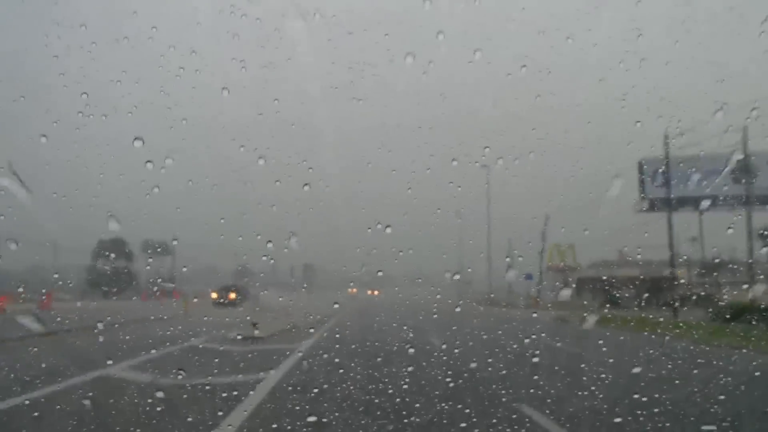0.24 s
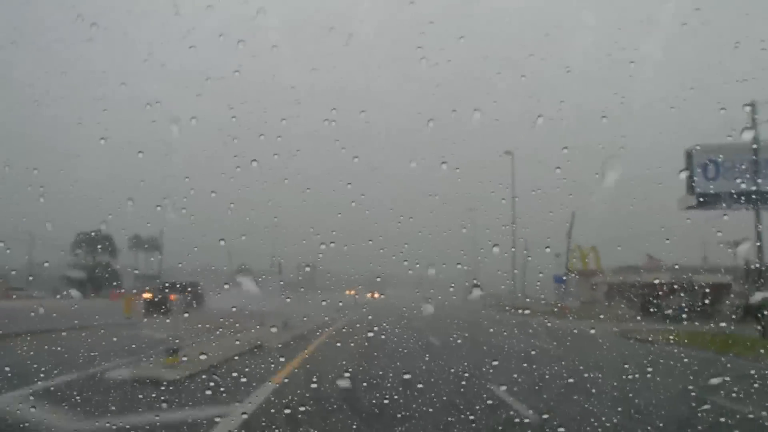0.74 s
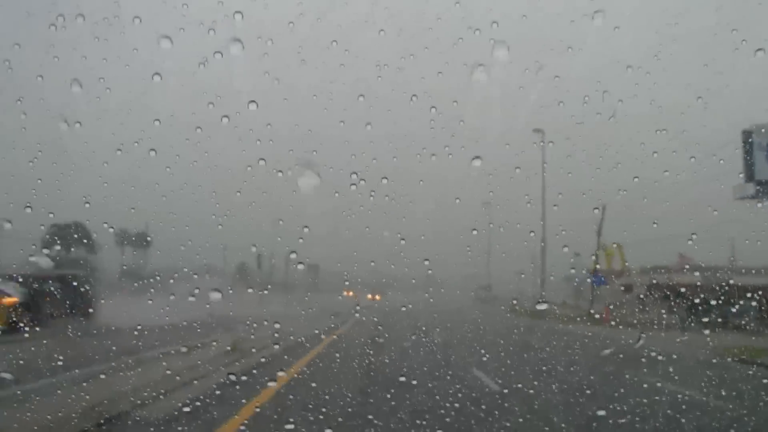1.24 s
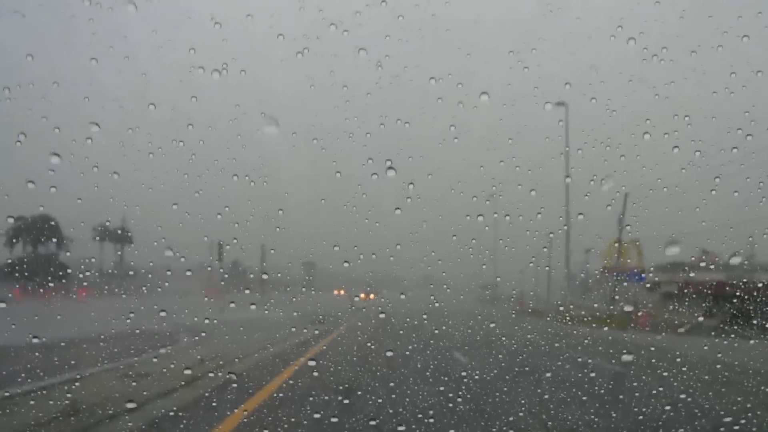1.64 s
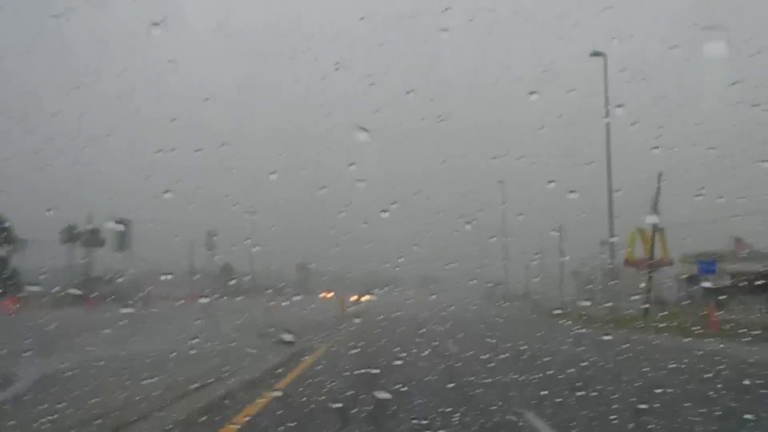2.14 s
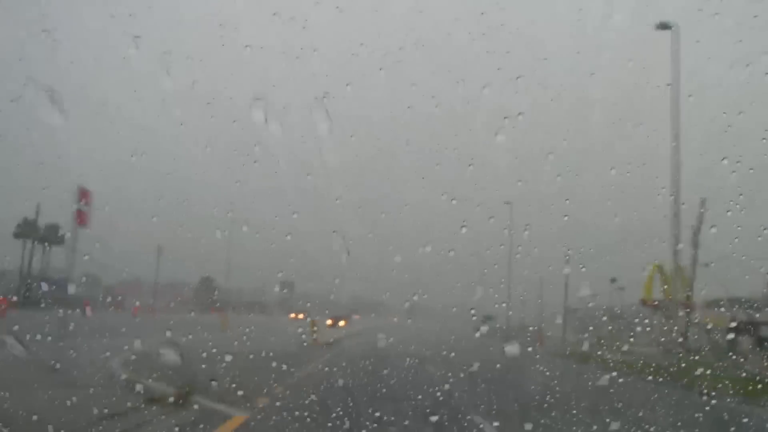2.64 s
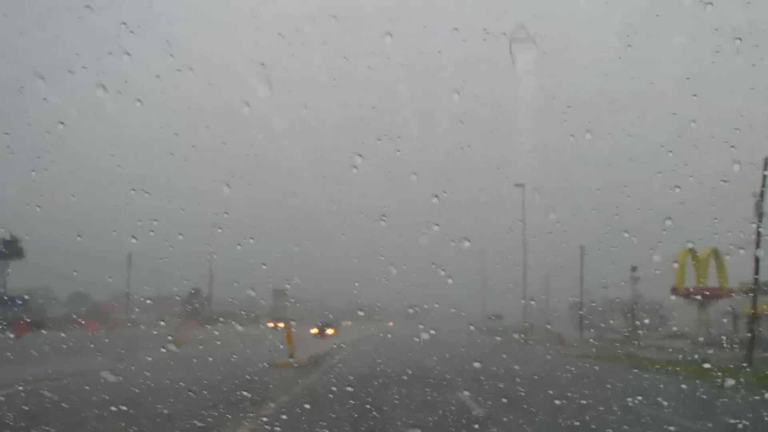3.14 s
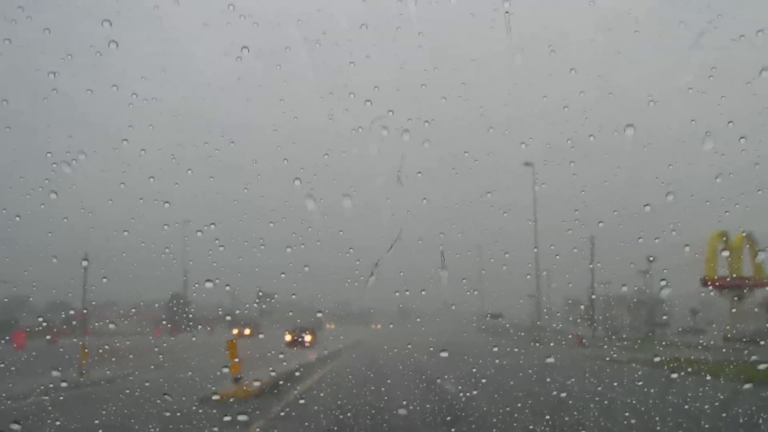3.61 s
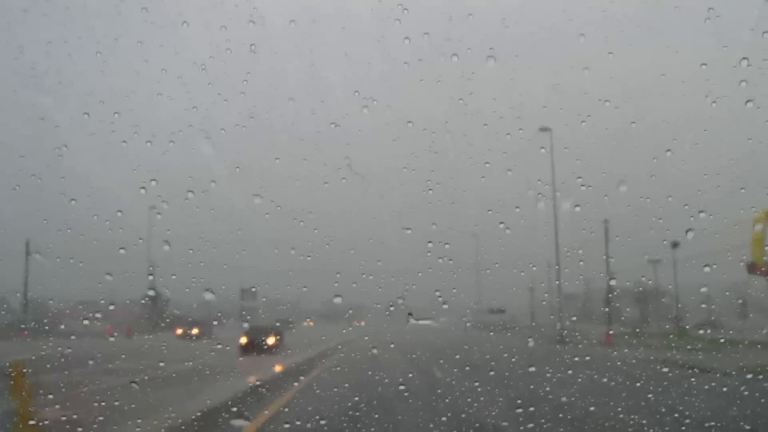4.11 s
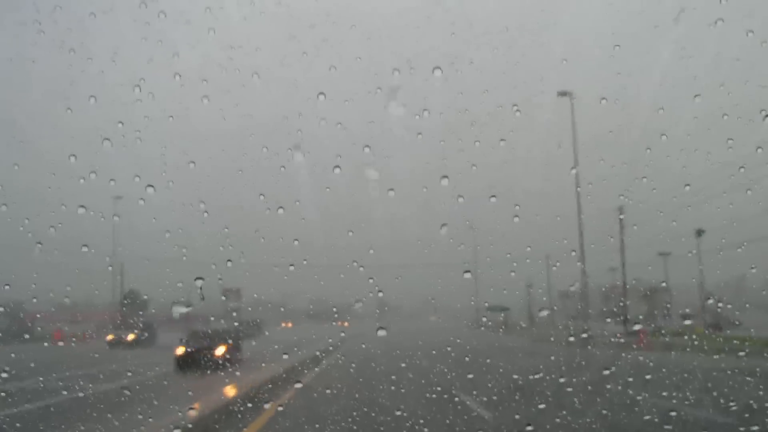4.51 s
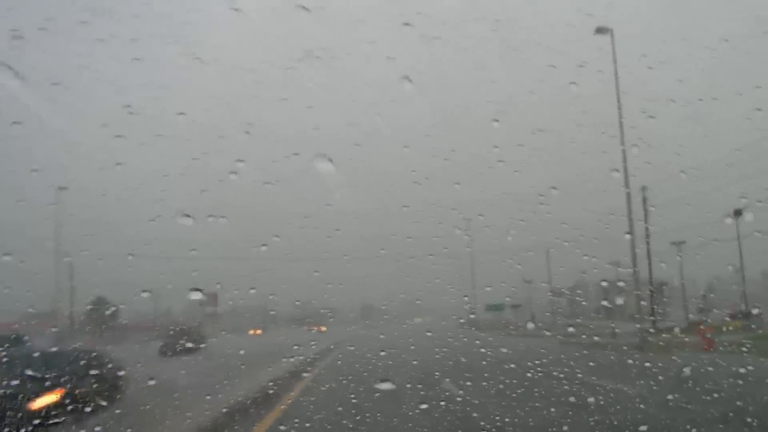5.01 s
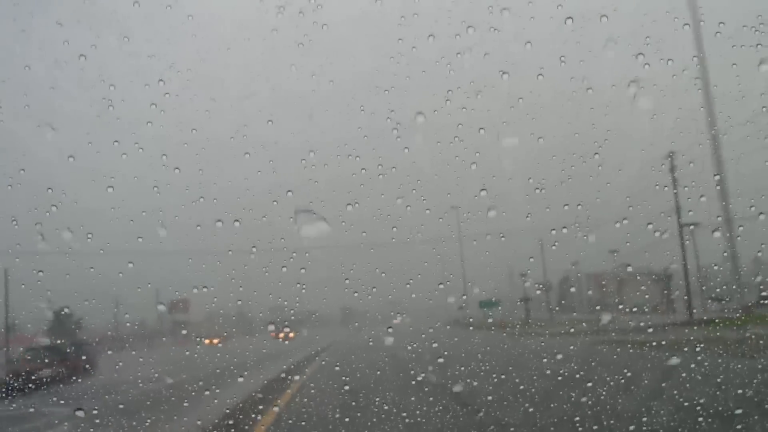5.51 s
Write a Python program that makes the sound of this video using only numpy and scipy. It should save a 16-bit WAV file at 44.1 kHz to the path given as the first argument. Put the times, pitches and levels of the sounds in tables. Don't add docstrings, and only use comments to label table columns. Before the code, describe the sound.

Inside a car driving through a heavy downpour, loud rain on windshield and roof fills the whole stretch of just under six seconds. It is a dense, rough hiss made of thousands of tiny impacts, strongest in the upper midrange, with a quieter fizz of spray on top. Single large drops snap out irregularly, a few per second, as hard, dry taps; prominent ones come near 0.3, 1.4, 2.4 and 3.7 s. Gusts lift the rain slightly around 1.3 and 3 s, and it slackens a little towards the end. After hard hits the level ducks for a moment, notably near 0.5, 2.4, 3.05 and 5.4 s. Far below are faint tyre roar and floor rumble, a bit rougher around 3.6 to 4.1 s, and a low engine hum that drops out after 2 s and returns by 3.3 s. Close, mono, slightly overloaded small microphone; little echo.

```python
import sys
import numpy as np
from scipy import signal
from scipy.fft import rfft, irfft
from scipy.io import wavfile
from scipy.ndimage import uniform_filter1d

SR = 44100
rng = np.random.default_rng(int(sys.argv[2]) if len(sys.argv) > 2 else 0)


def nominal_scale(level):
    x = np.asarray(level, float) / 20
    return 10 ** x


def output_pcm(signal):
    pcm = np.clip(np.atleast_2d(signal).T, -1, 1) * 32767
    wavfile.write(sys.argv[1], SR, np.round(pcm).astype(np.int16))


N = 254016

# (time [s], rain level [dB])
STORM = [(0, -15.5), (.3, -15), (.6, -16.5), (1.0, -16.3), (1.3, -14.5), (1.5, -17), (1.9, -17),
         (2.15, -17), (2.35, -15.5), (2.7, -16.5), (2.95, -14), (3.3, -15), (3.6, -15), (4.0, -16),
         (4.45, -16), (4.9, -16), (5.2, -16.5), (5.76, -17)]
# (frequency [Hz], gain [dB per Hz])
PANEL_RESPONSE = [(120, -47), (200, -18.5), (403, -21), (465, -23), (530, -12.5), (600, -12.5), (800, -9.5),
                  (1330, -9), (1950, -9.5), (2520, -3.5), (3460, -0.62), (4190, -10), (9000, -22),
                  (12000, -49)]
# (frequency [Hz], gain [dB per Hz])
SPRAY_RESPONSE = [(4120, -40), (7000, -8), (9390, -3.5), (12400, -5.5), (14600, -2), (15100, -3.5),
                  (15700, -10)]


def rain():
    rain_db = np.interp(np.arange(N) / SR, *np.transpose(STORM))
    spray_db = -18 + 0.09 * (rain_db + 20) + 0.4 * walk(4.4)
    gust = nominal_scale(0.52 * walk(30) + 0.7 * walk(90))
    roof = drops(4000, spread_db=3.6, most_db=7.7, splash_ms=0.6, tail_ms=3.6, tail_db=-6)
    glass = drops(1500, spread_db=7.0, most_db=13.0, splash_ms=0.38, tail_ms=1.5, tail_db=-10.5)
    dull, bright = split(glass, 1420)
    stiff_glass = bright + nominal_scale(-11.5) * dull
    patter = gust * (level(roof, -2.7) + nominal_scale(-4.0) * stiff_glass)
    body, _ = split(colour(patter, PANEL_RESPONSE), 7980)

    spray = drops(600, spread_db=4.7, most_db=20.5, splash_ms=0.3, tail_ms=3, tail_db=-24)
    _, fizz = split(spray, 9200)
    mist = level(patter, 0) + gust * nominal_scale(-3.5) * fizz
    _, treble = split(colour(mist, SPRAY_RESPONSE), 7900)
    return nominal_scale(rain_db) * (level(body, 0) + nominal_scale(spray_db) * level(treble, 0))


def drops(rate, spread_db, most_db, splash_ms, tail_ms, tail_db):
    chance = rng.random((2, N))
    size_db = -spread_db * np.log(chance[1] + 1e-9)
    size = nominal_scale(np.minimum(size_db, most_db))
    hits = (chance[0] < rate / SR) * size ** 2
    splash = fade(hits, splash_ms / 1000)
    tail = nominal_scale(tail_db) ** 2 * fade(hits, tail_ms / 1000)
    return level(np.sqrt(splash + tail) * rng.standard_normal(N), 0)


# (time of peak [s], peak level [dB], splash length [ms])
BIG_DROPS = [(0.0896, -7, 0.81), (0.2585, 1, 1.2), (0.5178, -6, 0.75), (0.7258, -0.5, 1.3),
             (0.9051, -0.5, 1.2), (1.0001, -3, 1.3), (1.3987, 1, 1.3), (1.4857, 2, .9), (1.6748, -4, 1.1),
             (1.7444, -2, 0.86), (1.8398, 0, 0.6), (2.0733, -2, 0.69), (2.4081, 1, 0.87),
             (2.6333, -3, 0.77), (2.6585, -3, .8), (2.7954, -8, .7), (2.8712, -12, 0.85),
             (3.0473, -6, 0.68), (3.3282, -3, 0.54), (3.4017, -9, .9), (3.6708, 1, 1.1), (3.9524, -1, 0.99),
             (4.242, -4, 1.1), (4.6803, -6, .6), (4.7105, -1, 0.66), (4.968, -2, 0.75), (5.085, -2, .63),
             (5.4096, -3, 1), (5.6101, -1, 0.82), (5.6781, -3, .95)]
# (time of peak [s], peak level [dB])
SPRAY_TICKS = [(0.0368, -16), (0.2034, -20), (0.4437, -15), (0.6782, -21), (0.726, -17), (0.8488, -16),
               (1.2288, -14), (1.2841, -17), (1.3034, -16), (1.3402, -16), (1.3829, -18), (1.6936, -16),
               (2.0492, -14), (2.2595, -17), (2.3344, -16), (2.4041, -18), (2.7053, -18), (2.949, -20),
               (2.971, -17), (3.3349, -18), (3.3867, -18), (3.6041, -16), (3.7263, -25), (3.8053, -25),
               (4.0655, -18), (4.3611, -17), (4.4933, -19), (4.8453, -36), (4.9579, -12), (5.084, -17)]


def big_drops():
    click = np.zeros(400)
    click[40] = 1
    dull, bright = split(colour(click, PANEL_RESPONSE)[:400], 1800)
    _, fizz = split(colour(click, SPRAY_RESPONSE)[:400], 9200)
    thud, edge = split(bright + nominal_scale(-8.0) * dull, 4600)
    tap_ring = thud + nominal_scale(-4.5) * edge + nominal_scale(-29.5) * fizz

    ordinary_taps = scattered(count=160, db=-5.5, scatter_db=1.5, ms=0.8, scatter_ms=0.3)
    ordinary_ticks = scattered(count=80, db=-20.5, scatter_db=1, ms=0.7, scatter_ms=0.093)
    strong_ticks = [(s, db, 0.55) for s, db in SPRAY_TICKS]
    taps = splashes([*BIG_DROPS, *ordinary_taps], tap_ring)
    ticks = splashes([*strong_ticks, *ordinary_ticks], fizz)
    return nominal_scale(1.0) * taps + nominal_scale(3.0) * ticks


def scattered(count, db, scatter_db, ms, scatter_ms):
    when = rng.uniform(0.02, N / SR - 0.02, count)
    size = rng.standard_normal((count, 2))
    return np.column_stack([when, db + scatter_db * size[:, 0], ms + scatter_ms * size[:, 1]])


def splashes(rows, ring):
    out = np.zeros(N + 400)
    t_ms = (np.arange(400) - 120) / SR * 1000
    for (s, db, ms), noise in zip(rows, rng.standard_normal((len(rows), 400))):
        width_ms = max(ms, 0.3) * np.where(t_ms < 0, 0.45, 0.6)
        burst = np.convolve(noise * np.exp(-(t_ms / width_ms) ** 2), ring)[:400]
        size = np.abs(burst)
        start = int(s * SR) - np.argmax(size)
        out[start:start + 400] += nominal_scale(db) * burst / size.max()
    return out[:N]


# (frequency [Hz], level [dB per Hz])
ROAD_SPECTRUM = [(12, -50), (23, -21), (31, -3), (58, -3), (72, -9), (105, -6), (135, -1.5), (170, 1.5),
                 (240, -3.5), (400, -3.5), (450, -6), (580, -37), (990, -120)]
# (time [s], level [dB])
ROUGHNESS = [(0, 2), (.5, -2), (.75, 2), (1.2, 1), (1.5, -7), (1.65, 0), (1.95, -2), (2.25, 1), (2.45, 1),
             (2.62, 4), (3.05, 0), (3.6, 7), (3.85, 4), (4.08, 8), (4.5, -8), (4.7, 0), (5.3, -1.5),
             (5.76, -4)]


def road():
    rough_db = np.interp(np.arange(N) / SR, *np.transpose(ROUGHNESS))
    shake, roar = split(colour(rng.standard_normal(N), ROAD_SPECTRUM), 114)
    return nominal_scale(rough_db) * level(shake, -50) + nominal_scale(0.36 * rough_db) * level(roar, -41.5)


# (time [s], base frequency [Hz], engine level [dB], gear whine level [dB])
ENGINE_RUN = [
    (0, 30, 0.5, -47),
    (.6, 29.88, 2.5, -47),
    (1.7, 29.6, 1, -50),
    (2.1, 29.6, -24, -53),
    (3.3, 29.28, 3.5, -58),
    (4.2, 29.15, 1, -52),
    (4.9, 29.27, -3, -50),
    (5.76, 29.43, -2.5, -50),
]
# (multiple of base frequency [1], level [dB])
ENGINE_ORDERS = [
    (4, -48.5),
    (5, -51),
    (6, -58),
    (8, -52.5),
]


def engine():
    t = np.arange(N) / SR
    s, hz, engine_db, whine_db = np.transpose(ENGINE_RUN)
    shaft_hz = np.interp(t, s, hz) * (1 + 0.0026 * walk(6.3))
    turn = 2 * np.pi * np.cumsum(shaft_hz) / SR
    hum = np.zeros(N)
    for multiple, db in ENGINE_ORDERS:
        hum += nominal_scale(db + 0.8 * walk(5.65)) * np.sqrt(2) * np.sin(multiple * turn)
    whine_hz = 548 * (1 + 0.00291 * walk(9.8))
    whine = np.sin(2 * np.pi * np.cumsum(whine_hz) / SR)
    return nominal_scale(np.interp(t, s, whine_db) + 3.5) * whine + nominal_scale(np.interp(t, s, engine_db)) * hum


def colour(x, points):
    hz, db = np.transpose(points)
    f = np.linspace(1, SR / 2, 4097)
    cepstrum = irfft(np.interp(np.log(f), np.log(hz), db) * np.log(10) / 20)
    cepstrum[1:4096] *= 2
    cepstrum[4097:] = 0
    return signal.fftconvolve(x, irfft(np.exp(rfft(cepstrum))))[:N]


def split(x, hz):
    low = signal.sosfiltfilt(signal.butter(3, hz, fs=SR, output="sos"), x)
    return low, x - low


def fade(x, seconds):
    return signal.lfilter([1], [1, -np.exp(-1 / (seconds * SR))], x)


def level(x, db):
    return x * nominal_scale(db) / np.sqrt(np.mean(x ** 2))


def walk(rate):
    hold = max(int(SR / rate), 2)
    steps = np.repeat(rng.standard_normal(N)[:N // hold + 1], hold)
    w = uniform_filter1d(uniform_filter1d(steps, hold), hold)[:N]
    return w / w.std()


def scene():
    return (rain() + big_drops() + road() + engine())[None]


# (time [s], ducking [dB])
OVERLOADS = [(.2800, 1), (0.5195, 7), (.7471, 2), (0.908, 4), (1.0030, 3), (1.4010, 1.5), (1.5870, 0),
             (2.0760, 2), (2.1030, 4.5), (2.41, 5.5), (2.4500, 1), (2.6340, 2), (2.9880, 2.5), (3.0520, 6),
             (3.2790, 5.5), (3.4026, 2.5), (3.5000, 0.5), (5.0120, -2.5), (5.0870, 4.5), (5.41, 4.6),
             (5.5400, 2), (5.6120, 4)]


def limiter(x):
    attack_s, release_s, ceiling = 0.0025, 0.042, 0.96
    blows = np.zeros(N)
    for s, db in OVERLOADS:
        blows[int(s * SR)] = db
    duck_db = fade(fade(blows, release_s), attack_s) / (attack_s * SR)
    x = x * nominal_scale(duck_db.mean() - duck_db)
    return x / (1 + np.abs(x / ceiling) ** 4) ** (1 / 4)


def band_limit(x):
    return signal.sosfilt(signal.butter(12, 16290, fs=SR, output="sos"), x)


def record(dry):
    top_cut = signal.ellip(12, 1, 65, 15730, fs=SR, output="sos")
    mix = signal.sosfilt(top_cut, limiter(dry))
    return band_limit(mix)


dry = scene()
out = record(dry)
output_pcm(out)
```